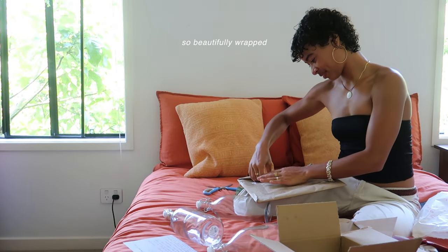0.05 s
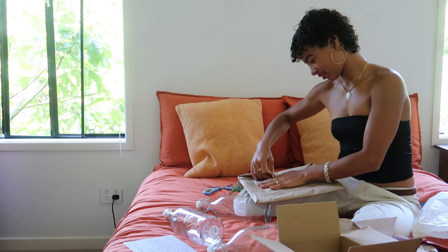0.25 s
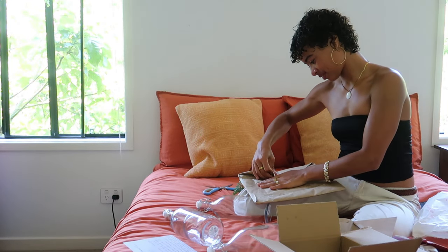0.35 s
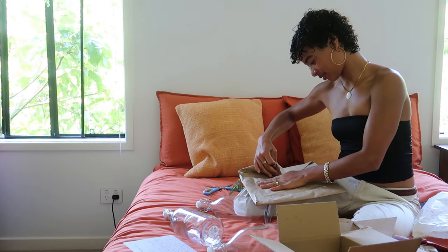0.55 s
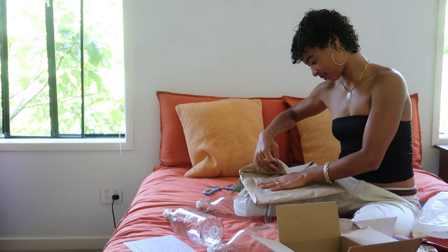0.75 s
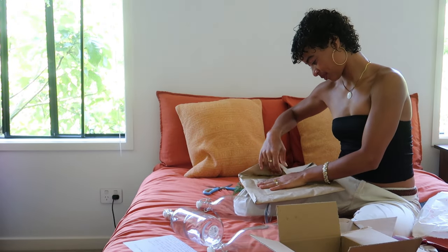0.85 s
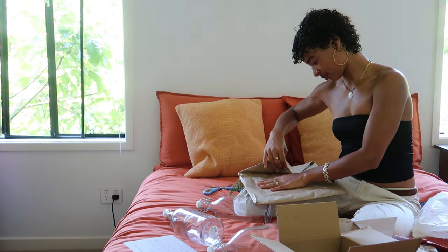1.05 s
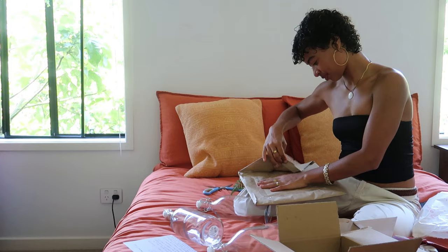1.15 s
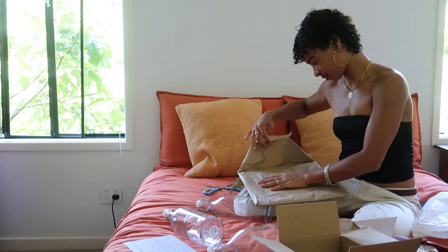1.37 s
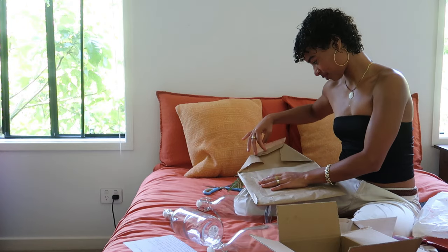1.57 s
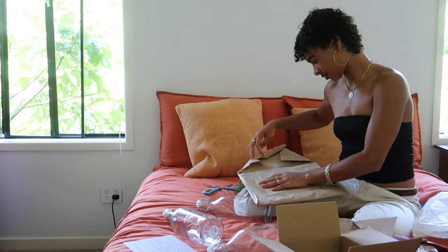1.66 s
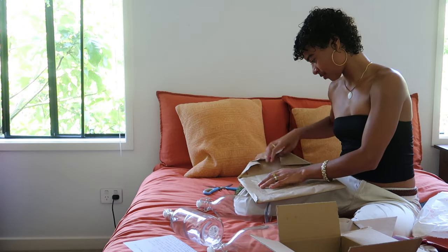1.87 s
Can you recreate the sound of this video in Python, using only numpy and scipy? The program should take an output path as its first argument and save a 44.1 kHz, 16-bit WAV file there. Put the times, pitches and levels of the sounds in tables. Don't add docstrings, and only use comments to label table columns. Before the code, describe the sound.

Stiff paper rustling in busy crisp bursts, one sharp loud crack, then sparse faint creases

```python
import sys
import numpy as np
from scipy import signal
from scipy.fft import rfft, irfft
from scipy.io import wavfile
from scipy.ndimage import uniform_filter1d

SR = 44100
rng = np.random.default_rng(int(sys.argv[2]) if len(sys.argv) > 2 else 0)


def nominal_scale(level):
    x = np.asarray(level, float) / 20
    return 10 ** x


def master_out(mix):
    frames = np.transpose(np.atleast_2d(mix))
    ceiling = np.clip(frames, -1, 1)
    pcm = np.round(ceiling * 32767).astype(np.int16)
    wavfile.write(sys.argv[1], SR, pcm)


N = 83790

# [peak_s, rise_s, fall_s_per_20db, level_db,
# pitch_hz]
PULLS = [(0.017, 0.14, -0.05, -39.5, 2730), (0.053, 0.027, 0.06, -35, 2990),
         (0.106, 0.011, -0.3, -44.5, 2930), (0.161, .008, -0.24, -36, 2460),
         (0.236, 0.031, 0.14, -29.5, 2270), (0.259, 0.028, 0.16, -36, 1900), (0.329, 0.018, 0.1, -33, 2330),
         (0.361, 0.015, 0.07, -26, 2440), (0.407, 0.26, 0.37, -32.5, 1760), (0.501, 0.02, 0.13, -30, 1840),
         (0.52, 0.017, 0.07, -29.5, 1760), (0.557, 0.092, 0.03, -30, 1660),
         (0.592, 0.12, -0.07, -31.5, 1560), (0.624, 0.094, 0, -30.5, 1880), (0.647, 0.043, 0.06, -30, 4200),
         (0.713, 0.11, 0.04, -28.5, 1800), (0.756, 0.11, 0.1, -29.5, 2350),
         (0.788, 0.026, 0.07, -28.5, 2500), (0.809, 0.059, 0.0939, -27, 2130),
         (0.862, 0.0063, 0.2, -32, 2560), (.905, .03, 1.6, -43, 2180),
         (0.984, 0.0083, -0.04, -33.5, 2980), (0.998, 0.0079, 0.03, -33, 3020),
         (1.03, 0.11, 0.3, -40, 2200), (1.085, 0.0073, 0.05, -47, 5000), (1.138, 0.032, 0.19, -27, 2260),
         (1.197, 0.14, 0.1445, -31.5, 2200), (1.233, 0.18, 0.11, -29.5, 2190),
         (1.274, 0.028, -0.0148, -20, 2930), (1.28, 0.019, -0.0051, -15.5, 2380),
         (1.296, 0.052, 0.1, -26, 2690), (1.358, 0.017, 0.26, -34.5, 2300),
         (1.437, 0.003, 0.2, -37.5, 2750), (1.461, 0.0029, 0, -28.5, 1810), (1.474, 0.019, 0.05, -31, 2140),
         (1.51, 0.06, 0.09, -37, 2420), (1.565, 0.026, 0.16, -41, 2230), (1.603, 0.0012, -0.06, -49, 2520),
         (1.658, 0.04, 0.14, -39, 2530), (1.72, 0.075, 0.12, -52, 2230), (1.784, 0.013, 0.12, -47, 3830),
         (1.865, 0.0019, -2.4, -48, 3500), (1.872, 0.005, -11.15, -47.5, 2580)]
# [freq_hz, level_db_per_hz]
CREASE_TONE = [(240, -44), (500, -9), (1150, -20), (1450, -5), (2300, -7.5), (3400, -8), (5000, -8.5),
               (11000, -22), (15500, -25.5)]
# [start_s, peak_db, pitch_hz]
SNAPS = [(0.0184, -27, 2430), (0.0433, -21, 3180), (0.1545, -28, 3380), (0.2219, -27, 1970),
         (0.3202, -27, 2540), (0.3476, -17, 2050), (0.4973, -21, 1580), (0.5164, -15, 1630),
         (0.5844, -18, 1500), (0.7791, -14, 2330), (0.8609, -15, 2980), (0.6943, -21, 2560),
         (0.5035, -18, 2300), (0.508, -18, 1700), (0.649, -17, 2400), (0.273, -20, 2400),
         (1.4652, -19, 2600), (1.4742, -19, 2200), (0.9818, -17, 3100), (0.9862, -17, 3900),
         (0.9858, -13, 2400), (0.9934, -20, 4440), (1.1223, -21, 2040), (1.2695, -11, 2200),
         (1.2785, -9, 2400), (1.4341, -20, 2650), (1.4561, -14.5, 1880), (1.6013, -21, 2500),
         (1.8637, -30, 3260), (1.8695, -33, 2600)]
# [middle_s, half_length_s, level_db, pitch_hz]
POCKETS = [(0.047, .006, -41.5, 2970), (0.177, 0.015, -48.5, 1600), (0.234, 0.014, -39.5, 2030),
           (.25, 0.018, -38, 3260), (0.392, 0.016, -37.5, 3200), (0.532, 0.026, -40.5, 3230),
           (0.735, 0.032, -39, 2940), (0.808, .02, -37, 3110), (0.869, 0.0072, -36, 3080),
           (0.259, 0.016, -39, 1480), (0.348, 0.0061, -35, 3330), (0.377, 0.015, -37, 1730),
           (0.497, 0.011, -36, 3000), (0.512, 0.004, -33, 1580), (0.54, 0.0065, -37, 1643),
           (0.555, 0.01, -38, 1500), (.587, 0.0053, -36, 1540), (0.576, .008, -41, 3350),
           (0.61, 0.015, -38, 1940), (0.631, 0.0073, -36.5, 1420), (0.656, .008, -39, 4700),
           (0.738, 0.018, -34, 1510), (0.78, 0.028, -30.5, 2370), (0.803, 0.011, -32, 1513),
           (1.045, 0.025, -47, 2240), (1.086, 0.0027, -42, 6250), (1.118, .012, -32.5, 2600),
           (1.14, 0.013, -34, 2940), (1.143, 0.0069, -29.5, 2110), (1.262, 0.0035, -32, 2200),
           (1.27, 0.0039, -23, 4370), (1.282, 0.0015, -26, 2400), (1.294, 0.011, -30, 2540),
           (1.388, 0.0097, -36, 2060), (1.64, 0.012, -43, 1980), (1.775, 0.0036, -60, 3300),
           (1.873, 0.0056, -42, 2530), (1.885, 0.0041, -48, 2420)]
# [time_s, level_db]
SHEET_MOTION = [(0.0, -51), (0.078, -59.5), (0.24, -48), (0.31, -59), (0.364, -44.5), (0.476, -54.5),
                (0.508, -44), (0.772, -42.5), (1.106, -51), (1.148, -37), (1.28, -32), (1.306, -40.5),
                (1.412, -50.5), (1.476, -36), (1.576, -50.5), (1.666, -47), (1.746, -53), (1.9, -55)]
# [freq_hz, level_db_per_hz]
SHEET_TONE = [(59, -45), (100, -15), (167, -7), (204, -19.5), (350, -1.5), (504, -8), (1260, -8),
              (2000, -90), (2600, -33), (4400, -120)]
# [start_s, level_db, pitch_hz]
THUMPS = [
    (0.234, -43.5, 101.6),
    (0.299, -45.5, 74.6),
    (1.14, -31, 370),
    (1.191, -29, 368),
    (1.227, -29, 393),
    (1.257, -43, 70),
    (1.262, -30.5, 348.3),
    (1.27, -31, 159),
    (1.65, -34, 557),
    (1.675, -44.5, 550),
]
# [middle_s, half_length_s]
TREBLE_DIPS = [(0.097, 0.011), (0.206, 0.024), (0.291, 0.025), (0.436, 0.027), (0.63, 0.018), (.845, 0.01),
               (0.925, 0.011), (1.022, 0.033), (1.365, 0.08), (1.52, 0.029), (1.608, 0.0088),
               (1.727, 0.038)]
# [freq_hz, t60_s]
ROOM_T60 = [(200, 0.18), (1000, 0.28), (4000, 0.25), (12000, 0.21)]
# [freq_hz, level_db]
FRONT_ROOM = [(200, -8), (1500, -11), (3000, -9), (8000, -13), (15000, -18)]
# [freq_hz, level_db]
SIDE_TONE = [(40, -45), (110, -22), (200, -13), (380, -13), (700, -18.5), (1280, -21), (2370, -22),
             (4370, -8), (8050, 1.5), (14900, 6)]
# [freq_hz, level_db_per_hz]
AIR_TONE = [(15, -33), (30, -17), (60, -8.5), (120, 0), (300, -16), (700, -26), (1500, -48), (2500, -20),
            (5500, -24.5), (15000, -53)]
# [time_s, level_db]
AIR_FADE = [(0, -1), (1.5, 1.5), (1.7, -3), (1.9, -5)]
# [time_s, level_db]
BED_RUMBLE = [(0, -41.5), (.12, -50), (.3, -56), (.6, -60), (1.5, -62), (1.9, -61.5)]

CREASES_PER_S, CREASE_SPREAD_DB, CREASE_CYCLES = 10000, 0, 3.1
FOCUS_DB, FOCUS_OCT = 6.5, 0.39
CLUMP_DB, CLUMP_S = 0.84, 0.0066
WANDER_OCT, WANDER_S = 0.13, 0.012
DULLING_DB_PER_OCT, DULL_HZ = 5, 3830
SNAP_DB, SNAP_CYCLES = -2.5, 4.0
RATTLE_S, RATTLE_DB = 0.004, -11
POCKET_Q = 7.3
FLAPS_PER_S, FLAP_SPREAD_DB = 3300, 1.5
THUMP_T60_S, THUMP_CYCLES = 0.06, 18
SHADE_HZ, SHADE_DB = 10000, -14
SHIFTS_PER_S = 3.984
SIDE_DIRECT_DB = -7.5
AIR_DB, RUMBLE_HZ = -51, 70
CEILING = 0.5
TIME_S = np.arange(N) / SR


def evened(x):
    return x / np.sqrt(np.mean(x ** 2) + 1e-20)


def read(points, hz):
    f, value = np.transpose(points)
    return np.interp(np.log(hz + 1), np.log(f + 1), value)


def curve(points):
    t, value = np.transpose(points)
    return np.interp(TIME_S, t, value)


def colour(x, points):
    return irfft(rfft(x) * nominal_scale(read(points, np.fft.rfftfreq(len(x), 1 / SR))), len(x))


def smooth_noise(size):
    return evened(uniform_filter1d(rng.standard_normal(N), size))


def grain(hz, cycles):
    u = np.arange(600) * hz / SR / cycles
    g = u ** 2 * np.exp(-6 * u) * np.sin(2 * np.pi * u * cycles * (1 - 0.05 * u))
    return g / np.linalg.norm(g)


def clicks(rate_per_s, spread_db, count):
    size = nominal_scale(spread_db * np.minimum(rng.exponential(1, N), 4)) * rng.choice([-1., 1.], N)
    return size * (rng.random(N) < rate_per_s / SR), rng.integers(0, count, N)


def creases():
    columns = np.transpose(PULLS)[:, :, None]
    peak_s, rise_s, fall_s, level_db, pitch_hz = columns
    rising = (peak_s - TIME_S) / abs(rise_s) / 1.49
    falling = (TIME_S - peak_s) / (abs(fall_s) + 0.0023)
    power = nominal_scale(2 * level_db - 45.3 * np.where(TIME_S < peak_s, rising, falling)) + 1e-12
    total = power.sum(0)
    pitch_oct = (np.log2(pitch_hz) * power).sum(0) / total
    pitch_oct = pitch_oct + WANDER_OCT * smooth_noise(round(WANDER_S * SR))
    letting_go = uniform_filter1d((power * (TIME_S > peak_s)).sum(0) / total, 300)

    size, which = clicks(CREASES_PER_S, CREASE_SPREAD_DB, count=36)
    size = size * nominal_scale(CLUMP_DB * smooth_noise(round(CLUMP_S * SR)))
    out = np.zeros(N)
    for k, hz in enumerate(np.linspace(26, 123, num=36) ** 2):
        focus_db = FOCUS_DB * np.exp(-0.5 * ((np.log2(hz) - pitch_oct) / FOCUS_OCT) ** 2)
        dulling_db = DULLING_DB_PER_OCT * max(np.log2(hz / DULL_HZ), 0) * letting_go
        level = nominal_scale(read(CREASE_TONE, hz) + focus_db - dulling_db) * hz ** 0.31
        out += signal.oaconvolve(size * (which == k) * level, grain(hz, CREASE_CYCLES))[:N]
    return evened(out) * np.sqrt(total)


def snaps():
    out = np.zeros(N + 2000)
    for start_s, peak_db, hz in SNAPS:
        ring = grain(hz, SNAP_CYCLES) + 0.35 * grain(1.89 * hz, 15.0) + 0.14 * grain(2.8 * hz, 8.8)
        at = round(start_s * SR)
        size = nominal_scale(peak_db + SNAP_DB) / abs(ring).max()
        out[at:at + 600] += size * ring
        for late, tone in rng.random((5, 2)):
            hit = at + round(late * RATTLE_S * SR)
            rattle = grain(hz * (0.46 + 0.82 * tone), 1.44)
            out[hit:hit + 600] += size * nominal_scale(RATTLE_DB - 2.5 * late) * rattle
    return out[:N]


def pockets():
    scrape = rng.standard_normal(N) * nominal_scale(1.3 * smooth_noise(90))
    out = np.zeros(N)
    for middle_s, half_s, level_db, hz in POCKETS:
        b, a = signal.iirpeak(hz, POCKET_Q, fs=SR)
        note = evened(signal.lfilter(b, a, signal.lfilter(b, a, scrape)))
        swell = np.exp(-0.5 * ((TIME_S - middle_s) / (abs(half_s) + 0.00092)) ** 2)
        out += nominal_scale(level_db) * note * swell
    return out


def sheet():
    size, which = clicks(FLAPS_PER_S, FLAP_SPREAD_DB, count=10)
    out = np.zeros(N)
    for k, hz in enumerate(np.geomspace(230, 1300, num=10)):
        flaps = signal.oaconvolve(size * (which == k), grain(hz, 3.14))[:N]
        out += flaps * nominal_scale(read(SHEET_TONE, hz)) * np.sqrt(hz)
    return evened(out) * nominal_scale(curve(SHEET_MOTION))


def thumps():
    out = np.zeros(N)
    for start_s, level_db, hz in THUMPS:
        t = np.maximum(TIME_S - start_s, 0)
        decay = nominal_scale(level_db - 60 * t / (THUMP_T60_S + THUMP_CYCLES / hz))
        out += np.minimum(t / 0.0083, 1) * decay * np.sin(2 * np.pi * hz * t)
    return out


def shaded(x):
    hidden = np.max([np.exp(-((TIME_S - s) / half) ** 4) for s, half in TREBLE_DIPS], axis=0)
    top = signal.sosfiltfilt(signal.butter(4, SHADE_HZ, "high", fs=SR, output="sos"), x)
    return x - top * hidden * (1 - nominal_scale(SHADE_DB))


def room(x):
    taps = np.zeros(SR // 2)
    at = np.arange(100, len(taps) - 20, 20)
    taps[at + rng.integers(0, 20, len(at))] = rng.choice([-1., 1.], len(at))
    hz, t, z = signal.stft(taps, SR, nperseg=256)
    decay = nominal_scale(-60 * t / read(ROOM_T60, hz)[:, None])
    tail = signal.istft(z * decay, SR, nperseg=256)[1]
    return signal.fftconvolve(x, tail / np.linalg.norm(tail))[:N]


def moving_room(x):
    turn = np.pi * SHIFTS_PER_S * TIME_S
    return room(x * np.sin(turn)) + room(x * np.cos(turn))


def air():
    tone = evened(colour(rng.standard_normal(N), AIR_TONE))
    lowpass = signal.butter(2, RUMBLE_HZ, fs=SR, output="sos")
    rumble = evened(signal.sosfilt(lowpass, rng.standard_normal(N)))
    return nominal_scale(AIR_DB + curve(AIR_FADE)) * tone + nominal_scale(curve(BED_RUMBLE)) * rumble


def scene():
    paper = creases() + snaps() + pockets() + sheet() + thumps()
    mid = shaded(paper + colour(moving_room(paper), FRONT_ROOM)) + air()
    side_direct = nominal_scale(SIDE_DIRECT_DB) * np.roll(paper, 37)
    side = colour(moving_room(paper) + side_direct + air(), SIDE_TONE)
    return np.array([mid + side, mid - side])


def roll_off(x):
    return signal.sosfilt(signal.butter(12, 15460, fs=SR, output="sos"), x)


def record(dry):
    mix = CEILING * np.tanh(dry / CEILING)
    return roll_off(mix)


dry = scene()
out = record(dry)
master_out(out)
```